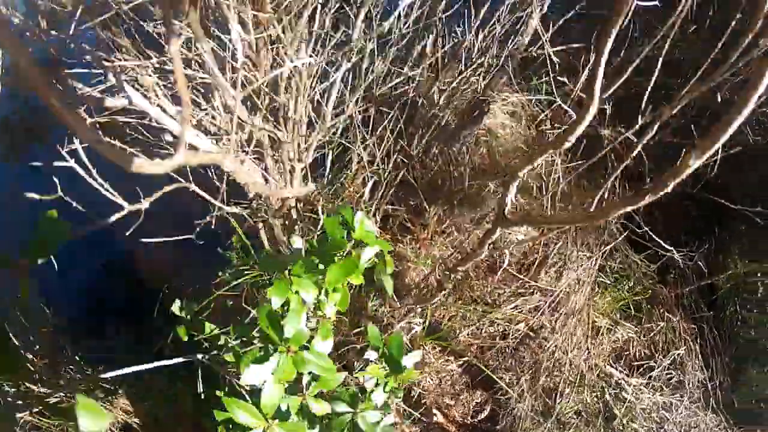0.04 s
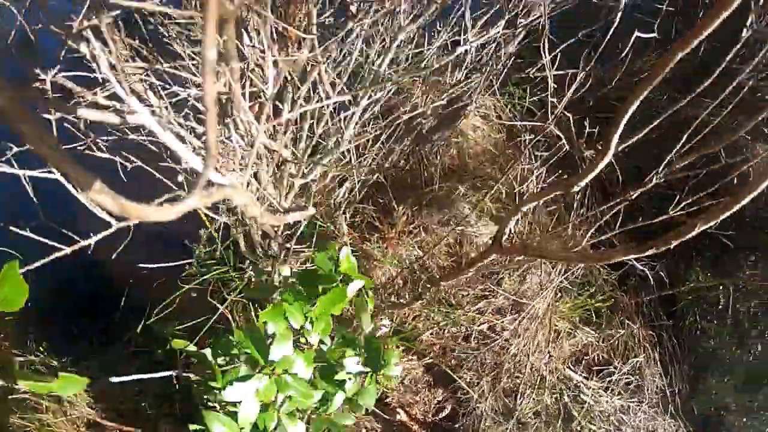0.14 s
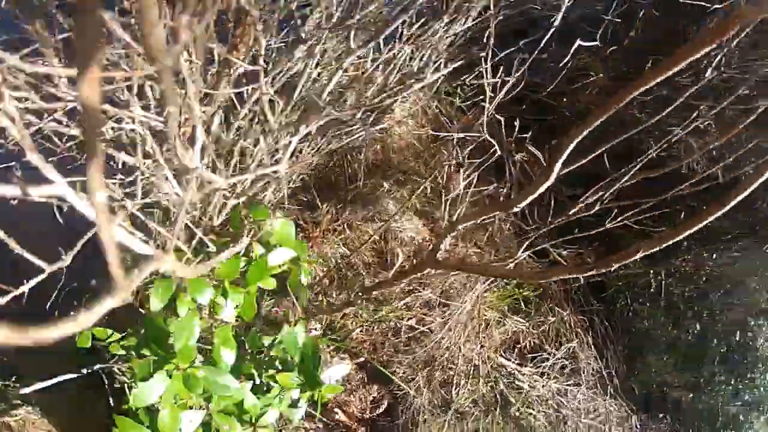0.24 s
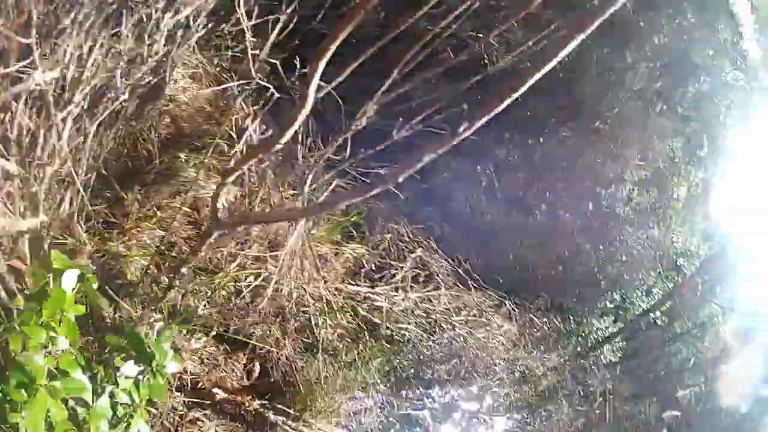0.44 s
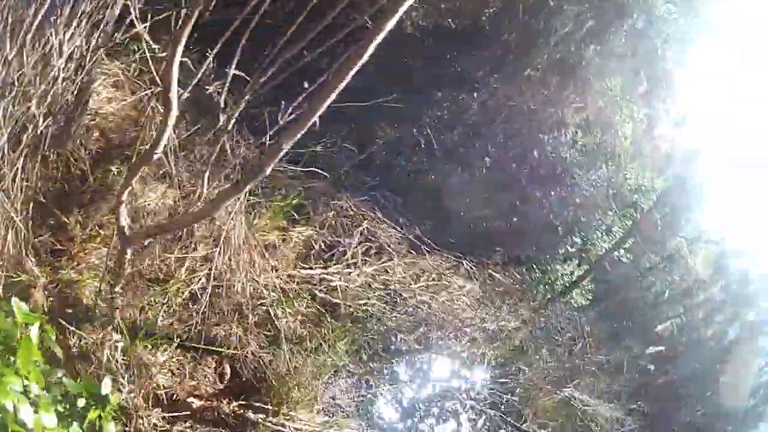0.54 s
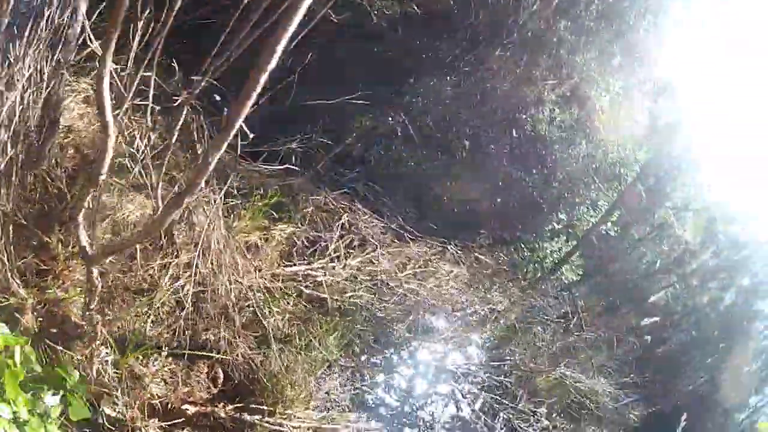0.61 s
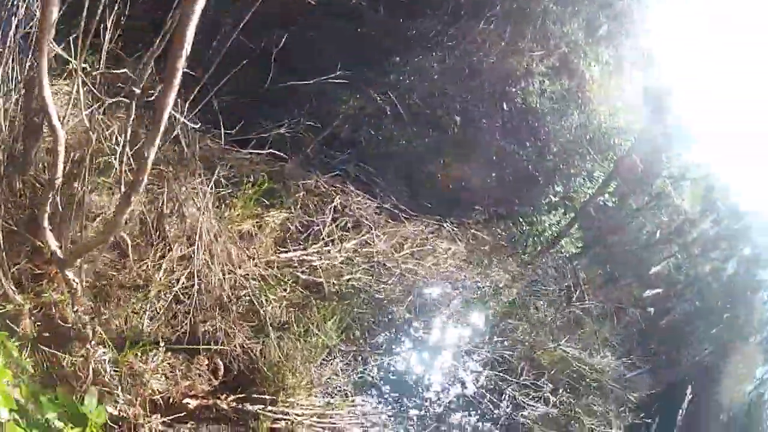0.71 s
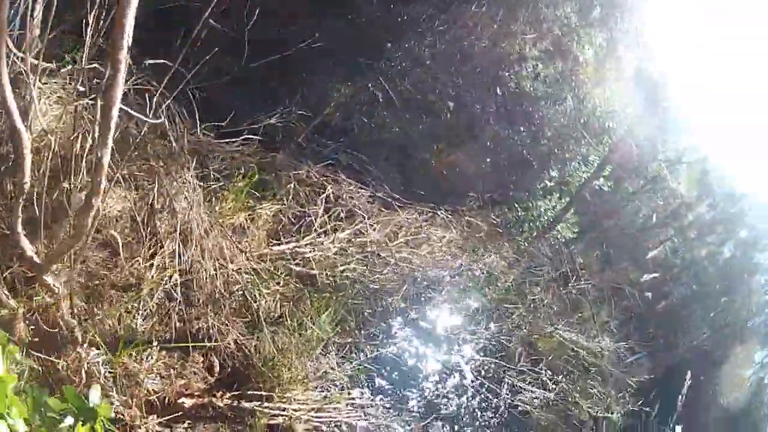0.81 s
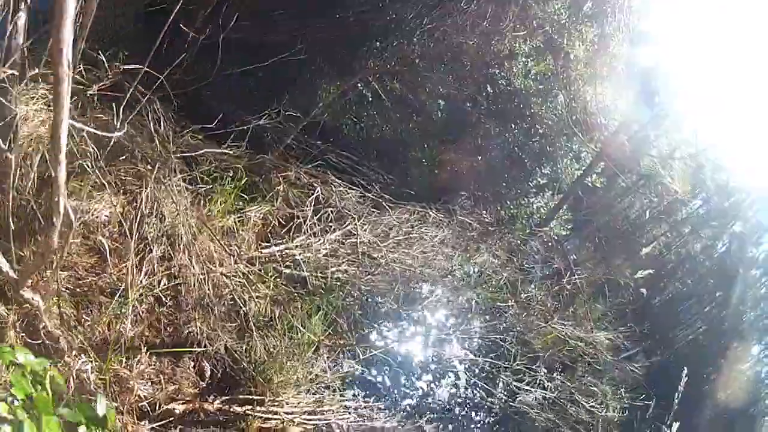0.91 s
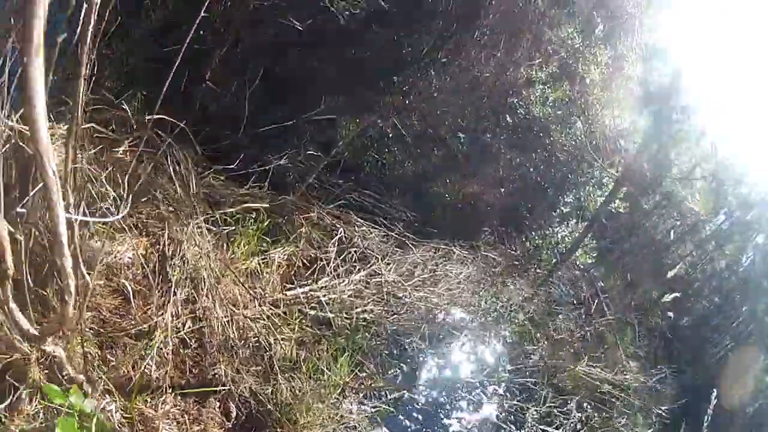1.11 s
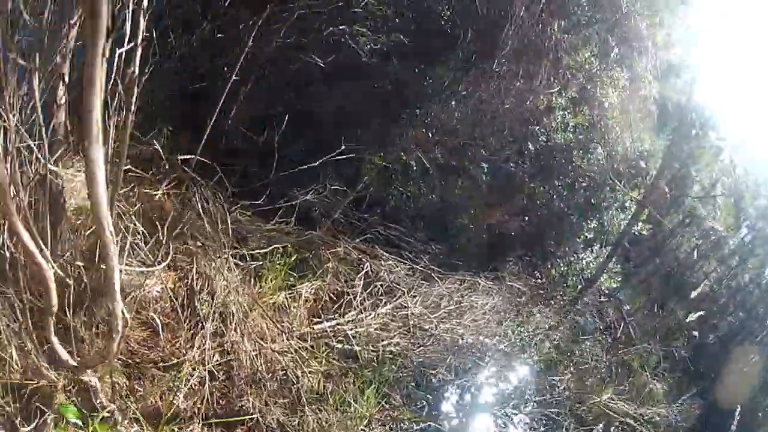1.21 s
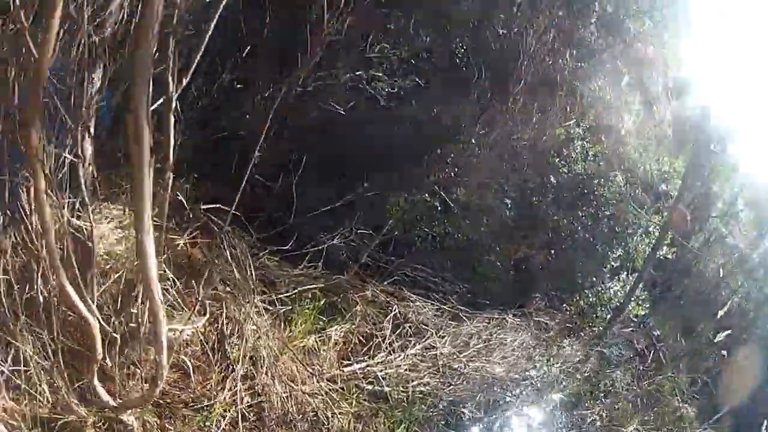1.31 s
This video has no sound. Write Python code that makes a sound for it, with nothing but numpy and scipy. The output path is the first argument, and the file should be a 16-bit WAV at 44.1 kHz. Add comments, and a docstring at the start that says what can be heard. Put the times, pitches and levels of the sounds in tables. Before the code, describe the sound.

Dry twigs crackle and snap loudly against a small plastic-cased camera pushed through outdoor brush

```python
"""In woods, dry twigs are pushed aside and drag, crackle and snap against a small camera in a closed plastic housing.
Rustle and dragging are filtered noise and stick-slip grains in flickering half-octave bands. Snaps are bursts of
cracks through twig and housing resonances, with decaying sines for the thumps and one thick stub. The camera samples
slowly and holds each sample, which mirrors the spectrum into the treble; the highest peaks jolt the channels apart."""
import sys
import numpy as np
from scipy import signal
from scipy.fft import rfft, irfft
from scipy.io import wavfile
from scipy.ndimage import uniform_filter1d

SR = 44100
rng = np.random.default_rng(int(sys.argv[2]) if len(sys.argv) > 2 else 0)


def invert_db(x):
    """Field ratio 10**(x/20) for x, a level in decibels (scalar or array-like)."""
    u = np.asarray(x, float) / 20
    return 10 ** u


def int16_out(signal):
    """Quantize to a 16-bit WAV file."""
    q = np.round(np.clip(np.atleast_2d(signal).T, -1, 1) * 32767)
    wavfile.write(sys.argv[1], SR, q.astype(np.int16))


N = 59535  # length in samples


def unit(x):
    """Normalisation by signal power: scale to rms 1."""
    return x / np.sqrt(np.mean(x ** 2))


def peak(x):
    """Normalisation by crest: scale to a largest excursion of 1."""
    return x / abs(x).max()


def add(out, start_s, x):
    """Superposition: mix a short sound in at start_s seconds."""
    i = int(start_s * SR)
    out[i:i + len(x)] += x[:N - i]


def band(x, lo_hz, hi_hz):
    """Band limitation: Butterworth band-pass with two pole pairs."""
    return signal.sosfilt(signal.butter(2, [lo_hz, hi_hz], "band", fs=SR, output="sos"), x)


def resonate(x, hz, q):
    """Simple resonance: one pole pair of centre frequency hz and quality factor q."""
    return signal.lfilter(*signal.iirpeak(hz, q, fs=SR), x)


def colour(x, points):
    """Minimum-phase filtering: a gain through (f/Hz, level/dB) points, made causal by folding its cepstrum."""
    points = np.array(points, float)
    hz = np.arange(1025) * SR / 2048 + 1
    gain_db = np.interp(np.log(hz), np.log(points[:, 0]), points[:, 1])
    cepstrum = irfft(gain_db * np.log(10) / 20)
    cepstrum[1:1024] *= 2
    cepstrum[1025:] = 0
    impulse = irfft(np.exp(rfft(cepstrum)))
    return signal.fftconvolve(x, impulse)[:len(x)]


def split(x):
    """Half-octave analysis: zero-phase slices, the first below 40 Hz, that sum to x below about 7.2 kHz."""
    lows = [0 * x]
    for hz in 40 * 2 ** np.arange(0, 8, .5):
        lows.append(signal.sosfiltfilt(signal.butter(2, hz, fs=SR, output="sos"), x))
    return np.diff(lows, axis=0)


def walk(rate):
    """Slow random modulation: Gaussian levels held 1 / rate s and slewed twice."""
    k = int(SR / rate)
    held = np.repeat(rng.standard_normal(N // k + 1), k)
    return 1.05 * uniform_filter1d(uniform_filter1d(held, k), k)[:N]


def ring(modes):
    """Modal superposition: decaying sines of (f/Hz, level/dB, T60/s) modes."""
    t = np.arange(4096) / SR
    return sum(invert_db(db) * np.sin(2 * np.pi * hz * t) * 1000. ** (-t / t60) for hz, db, t60 in modes)


# vibration modes of the plastic shell, levels relative: f/Hz, level/dB, T60/s
HOUSING_MODES = [(893, -1, 0.06), (1090, 0, 0.031), (1834, -7, 0.06), (2590, 4.5, 0.029), (3390, -9, 0.044),
                 (4350, -5, 0.03), (5430, 21, 0.0056)]


def housing(x):
    """Convolution with a modal impulse response: the blow itself plus the ring of the plastic shell."""
    shell_db = -11.5  # energy of the ring of a unit blow
    shell = ring(HOUSING_MODES)
    shell = shell / np.sqrt(np.sum(shell ** 2))
    return x + invert_db(shell_db) * signal.fftconvolve(x, shell)[:len(x)]


# relative spectrum of the distant rustle: f/Hz, level/dB
WOODS_COLOUR = [(18, -61), (30, -7.5), (662, 2), (1030, -17.5), (1120, 0), (1340, -17), (1500, -9.5),
                (4330, -26), (5280, -9.5), (5900, -12), (7670, -66), (13000, -120)]


def woods():
    """Filtered noise with independent band modulation: a soft rustle whose bands flicker alone."""
    level_db, flicker_db, flicker_per_s = -47.5, 3, 25.2  # rms; dB per unit of the walk; new levels per s
    slices = split(colour(rng.standard_normal(N), WOODS_COLOUR))
    rustle = sum(part * invert_db(flicker_db * walk(flicker_per_s)) for part in slices)
    return invert_db(level_db) * unit(rustle)


# dragging contact, level before a fixed offset: t/s, level/dB, tilt/(dB per octave)
DRAG_CONTACT = [(0, -48.5, 2.5), (0.141, -53, 7), (0.149, -25, -8), (0.186, -32, 4), (.2, -27.5, 1.5),
                (.235, -24.5, .5), (.247, -21.5, .6), (0.263, -23, 2.5), (0.276, -26.5, 9.5),
                (0.289, -19, -1), (0.302, -28.5, 1.5), (.33, -21.5, -3.5), (.35, -20, -1.5), (.37, -15, 0),
                (.4, -18, -0.1), (0.429, -22.5, 2.5), (0.448, -25, 8), (0.467, -31.5, -4), (.55, -36.5, -2),
                (0.563, -39, 3.5), (0.568, -23.5, 2.5), (.588, -27, -3.5), (.595, -42.5, 0), (.62, -37, -3),
                (0.637, -49, 1.5), (0.652, -25.5, -2), (.668, -33, -4), (0.686, -20, -1.2),
                (0.695, -33, -.6), (.705, -34.5, 6.3), (.73, -25.5, -6), (.745, -59, 8.5), (0.758, -38, -3),
                (0.764, -24, -6), (0.798, -38, -4), (.85, -44.5, 5.3), (.9, -47, -0.5), (1.0, -52.5, -3.5),
                (1.038, -55, -12), (1.12, -49.5, -7), (1.139, -43.5, -1.5), (1.19, -59, 6), (1.212, -50, 1),
                (1.26, -50, 4), (1.3, -62, 9.5), (1.35, -48, -2)]
# relative spectrum put on the housing's response to the slips: f/Hz, level/dB
DRAG_COLOUR = [(47, -24), (80, -14), (719, -6.5), (860, -2), (1230, -1), (2230, -5.5), (2530, 2),
               (5200, -5.5), (5900, 4), (7670, -67), (13000, -120)]


def slips():
    """Stick-slip friction: randomly timed, uneven grains excite the shell."""
    per_s, spread_db = 6500, 3  # mean rate; dB per unit of the exponential draw
    starts = rng.random(N) < per_s / SR
    strength = invert_db(spread_db * np.minimum(rng.exponential(size=N), 4))
    grains = starts * rng.standard_normal(N) * strength
    return unit(colour(housing(grains), DRAG_COLOUR))


def drag():
    """Friction with varying contact: twigs slip along the shell, duller or brighter as the contact changes."""
    offset_db, wander_db, wander_per_s = 0.57, 4.5, 63  # wander_db is per unit of the walk
    t = np.arange(N) / SR
    times, levels, tilts = np.array(DRAG_CONTACT).T
    level = np.interp(t, times, levels)
    tilt = np.interp(t, times, tilts)
    grain_draws = [split(slips()) for _ in range(3)]
    out = np.zeros(N)
    for k in range(16):
        octaves = max(k, 7) / 2 - 5.5  # the tilt pivots at slice 11 and is flat up to slice 7
        gain_db = tilt * octaves + wander_db * walk(wander_per_s)
        out += grain_draws[k % 3][k] * invert_db(gain_db)  # neighbouring slices come from independent draws of grains
    return out * invert_db(level + offset_db)


# twig snaps, knock re the snap's level: t/s, level/dB, twig f/Hz, knock level/dB, knock f/Hz
TWIG_SNAPS = [(0.031, -29.5, 5320, -10.5, 640), (0.144, -7, 3640, -18.5, 1080),
              (0.197, -22, 2680, -34, 1030), (0.205, -11.5, 3550, -22, 1250), (0.212, -16, 2670, -11, 1100),
              (0.233, -9.5, 3400, -39, 1180), (0.239, -11, 1900, -1, 910), (0.25, -5.5, 4100, -22, 821),
              (0.263, -4.5, 3330, -12.5, 930), (0.274, -14, 3400, -5, 697), (0.277, 3.5, 3760, -18, 970),
              (0.281, -7.5, 4000, -33, 1010), (0.29, -9.5, 1860, -1.5, 883), (0.303, -22, 2490, -15, 1170),
              (0.312, -19, 1440, -10, 1110), (0.328, -11.5, 1440, -4, 620), (0.335, -20, 2580, 0, 1200),
              (0.351, -9.5, 2500, -16, 1250), (0.365, -4, 2380, -8, 1020), (0.371, -6.5, 1990, -21, 1090),
              (0.381, -6.5, 1700, -43, 1190), (0.388, 5, 2720, -8.5, 870), (0.394, -11.5, 1680, -9.5, 834),
              (0.408, -14.5, 2850, -11, 820), (0.413, -11.5, 2700, -9, 856), (0.422, -7, 1880, -13, 830),
              (0.424, -19, 2590, -8, 807), (0.434, -10, 2660, -34, 1150), (0.445, -19.5, 2770, -10.5, 1010),
              (0.48, -26.5, 2720, -8, 940), (0.51, -30, 2330, -3, 600), (0.566, -14.5, 4000, -9, 1020),
              (0.575, -16, 4000, -5.5, 820), (0.585, -22, 4260, -10, 821), (0.6, -31, 2820, -1.5, 1020),
              (0.612, -26, 1410, -3.5, 1080), (0.651, -20, 2190, -25, 1080), (0.675, -24.5, 2800, 0, 860),
              (0.678, -2, 4140, -45, 1110), (0.695, -13.5, 2800, -11.5, 635),
              (0.701, -18.5, 2620, -12, 750), (0.71, -30, 2410, 1, 807), (0.723, -19.5, 2500, 4, 866),
              (0.763, -16, 1296, -5.5, 810), (0.77, -30.5, 2600, 0, 600), (0.789, -30.5, 1910, 17, 800),
              (0.825, -31, 3390, -12, 650), (0.843, -33, 2430, -1, 624), (0.911, -24.5, 1490, 3, 705),
              (0.916, -51, 5500, 0, 700), (0.958, -26, 1430, 4, 910), (0.965, -31.5, 2940, -5.5, 888),
              (1.087, -37.5, 2230, -0.5, 740), (1.129, -29, 2520, -1.5, 1080),
              (1.2, -37.5, 2300, -4.5, 600), (1.205, -33.5, 2220, -3.5, 1090), (1.245, -35, 2050, 2, 710),
              (1.253, -30, 2330, -9.5, 643)]


def crack_burst():
    """Brittle fracture: after a short fixed delay, cracks of random size and sign swell quickly and fade."""
    delay_ms, break_ms = 1.2, 4.3  # delay before the first crack; span of the cracks
    count, rise, range_db = 20, 0.21, 12  # rise: fraction of the break at which the swell peaks
    when, size, sign = rng.random((3, count))
    swell = np.minimum(when / rise, (1 - when) / (1 - rise)) ** 0.63
    at = (delay_ms + break_ms * when) * SR / 1000
    cracks = np.zeros(4096)
    np.add.at(cracks, at.astype(int), swell * np.sign(sign - .5) * invert_db(-range_db * size))
    return cracks


def snaps():
    """Source-filter principle: cracks excite the twig's resonance, with a hollow housing knock under it."""
    twig_q, knock_q = 5.5, 3.17
    splinter_db, splinter_slope = -7, 0.66  # at a 0 dB snap; dB per dB of strength
    out = np.zeros(N)
    for s, db, hz, knock_db, knock_hz in TWIG_SNAPS:
        rung = housing(crack_burst())
        twig = resonate(band(rung, 850, 9400), hz, twig_q)
        # harder breaks spread over all pitches
        hard = band(rung, 880, 9000) * invert_db(splinter_db + splinter_slope * db)
        twig = peak(twig) + hard / abs(rung).max()
        knock = resonate(band(rung, 280, 1370), knock_hz, knock_q)
        share = min(invert_db(knock_db), .97)  # the twig takes the rest of the power
        add(out, s, invert_db(db) * (np.sqrt(1 - share ** 2) * peak(twig) + share * peak(knock)))
    return out


# blows that shake the whole camera, level before decay: t/s, level/dB
BLOWS = [(0.144, -21.5), (0.242, -24), (0.278, -19), (0.386, -16.5), (0.568, -24.5), (0.68, -11),
         (0.764, -35), (0.913, -29)]


def thumps():
    """Heavily damped oscillation: a soft shake of the camera, mostly gone after one cycle."""
    hz, t60_s = 238, 0.014
    t = np.arange(2048) / SR
    shake = np.sin(2 * np.pi * hz * t) * 1000. ** (-t / t60_s)
    out = np.zeros(N)
    for s, db in BLOWS:
        add(out, s, invert_db(db) * shake)
    return out


# break of a thick dry stub: t/s, peak level/dB
STUB_BREAK = (.1455, -3)
# the stub's modes, levels relative: f/Hz, level/dB, T60/s
STUB_MODES = [(1080, -0.5, 0.071), (1910, -17, 0.041), (2660, -13, .05), (3386, 0.5, 0.048),
              (3570, -7.5, 0.034), (4360, -25, 0.013), (5420, 4, 0.017)]


def stub():
    """Free modal decay: a thick dry stub breaks clean and rings on."""
    out = np.zeros(N)
    start_s, db = STUB_BREAK
    add(out, start_s, invert_db(db) * peak(ring(STUB_MODES)))
    return out


def scene():
    """Linear superposition: one microphone feeds both channels with the sum of all sources."""
    return np.tile(woods() + drag() + snaps() + thumps() + stub(), (2, 1))


def sample_and_hold(x):
    """Zero-order hold: sampled at 12 kHz and softly limited, each sample held four steps of 48 kHz."""
    limit_db = -2.6
    slow = signal.resample_poly(x, 40, 147, axis=1)
    slow = invert_db(limit_db) * np.tanh(slow / invert_db(limit_db))
    return signal.resample_poly(np.repeat(slow, 4, axis=1), 147, 160, axis=1)[:, :N]


def jolt(held):
    """Threshold nonlinearity: big peaks shift the two channels' offsets oppositely, then relax."""
    from_db, gain_db, low_hz, smooth_s = -10.5, -1.5, 3, 0.00091
    over = np.maximum(abs(held[0]) - invert_db(from_db), 0)
    corners = [low_hz, 1 / (2 * np.pi * smooth_s)]
    shift = signal.lfilter(*signal.butter(1, corners, "band", fs=SR), over)
    return held + invert_db(gain_db) * shift * np.array([[-1], [1]])


def top_cut(x):
    """Nothing passes above the cut-off."""
    return signal.sosfilt(signal.butter(12, 16510, fs=SR, output="sos"), x)


def record(dry):
    """Signal chain of the camera: slow sample-and-hold, channel jolts, then a steep low-pass at 15350 Hz."""
    x = jolt(sample_and_hold(dry))
    x = signal.sosfiltfilt(signal.ellip(8, .1, 40, 15350, fs=SR, output="sos"), x)
    return top_cut(x)


dry = scene()
out = record(dry)
int16_out(out)
```